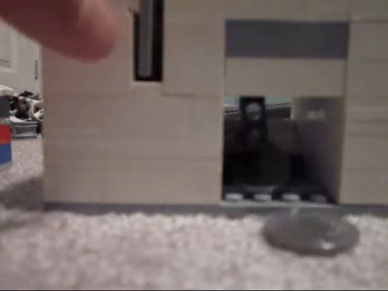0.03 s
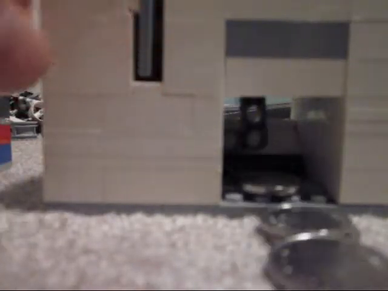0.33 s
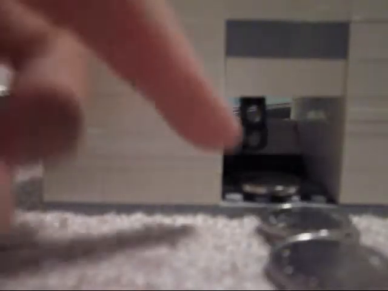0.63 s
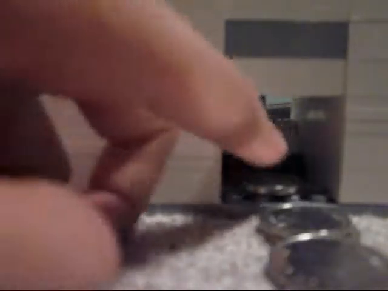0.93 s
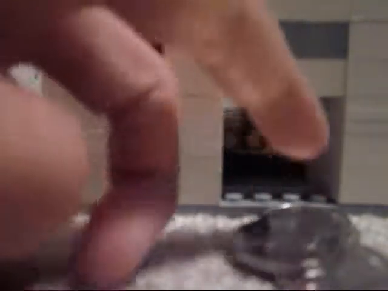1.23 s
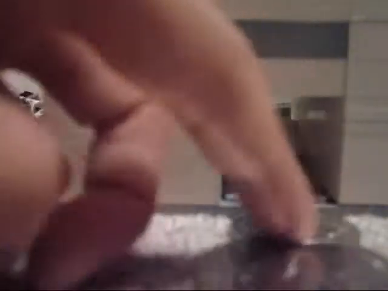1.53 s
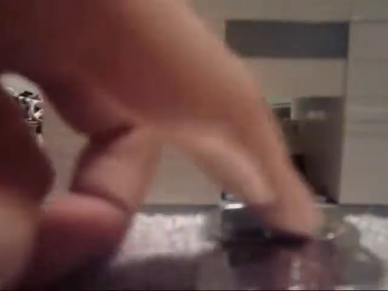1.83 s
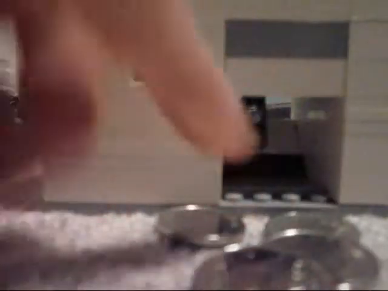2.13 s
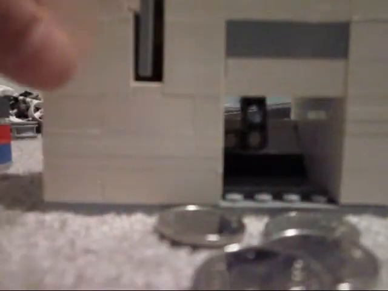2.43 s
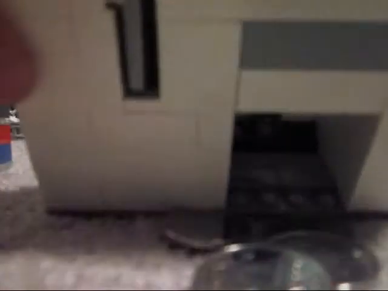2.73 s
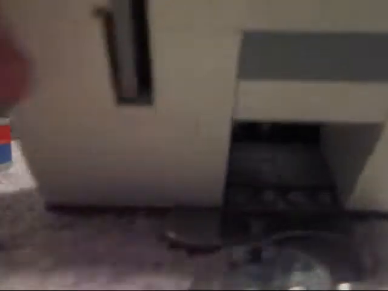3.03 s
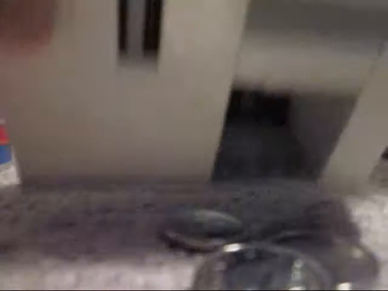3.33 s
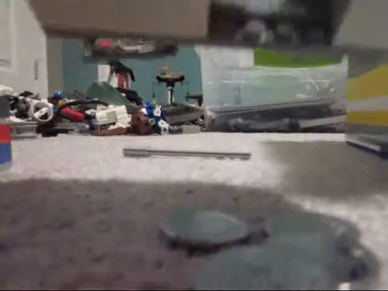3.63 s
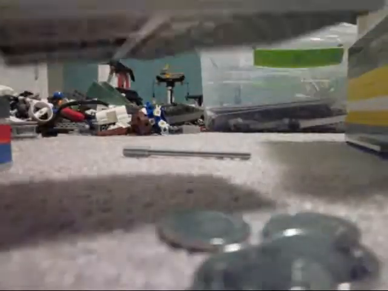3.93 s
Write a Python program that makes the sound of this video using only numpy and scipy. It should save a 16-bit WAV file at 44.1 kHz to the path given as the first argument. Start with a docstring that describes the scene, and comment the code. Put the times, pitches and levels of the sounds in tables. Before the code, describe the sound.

In a quiet room, coins clatter into the tray of a plastic brick toy, and a finger flicks one out and slides them over carpet. The handled toy then knocks and rustles, close to a slightly crackly microphone.

```python
"""On the carpet of a quiet room, close to a toy machine built of plastic bricks. Coins rattle down its
chute and drop into the tray; a finger flicks one out and slides the pile over the carpet. Then the hollow
box is gripped and lifted, its loose parts clacking. The microphone is that of a small camera close by,
whose low sample rate and coarse steps add crackle and a glassy treble."""
import sys
import numpy as np
from scipy import signal
from scipy.io import wavfile
from scipy.ndimage import uniform_filter1d

SR = 44100
rng = np.random.default_rng(int(sys.argv[2]) if len(sys.argv) > 2 else 0)


def digitize_waveform(pressure):
    """Quantize a signal to 16-bit integers and store it at the path in sys.argv[1].

    Rows of a 2-D input are taken as channels; values are limited to [-1, 1].
    """
    field = np.atleast_2d(pressure).T
    bounded = np.clip(field, -1, 1)
    quanta = np.round(bounded * 32767).astype(np.int16)
    wavfile.write(sys.argv[1], SR, quanta)


N = 176400

# Coins striking the chute and tray. Each row: time in seconds, relative level in dB,
# then offsets in dB for the clack, edge and thump bands.
COIN_HITS = [(0.016, -28, -1, -12, -27), (0.024, -29.5, -0.5, -10.5, -20.5),
             (0.03, -29.5, 1.5, -5.5, -20.5), (0.075, -32, 0.5, -7.5, -26), (0.089, -33, 4, -27, -15),
             (0.101, -29, 1, -3.5, -25), (0.121, -24, -3, -5, -15.5), (0.128, -25.5, -1.5, -5, -25),
             (0.167, -25, -2.5, 4, -19.5), (0.224, -34, -9, -2.5, -12.5), (0.345, -21.5, -3.5, -6.5, -41),
             (0.349, -27, -0.5, -10.5, -28), (0.37, -29, -2, -6, -20.5), (0.394, -38, -4.5, -2, -29),
             (1.051, -16.5, -2, -7.5, -20.5), (1.056, -26.5, -6.5, -44, -26), (1.077, -39.5, 7, -0.5, -4.5),
             (1.117, -16, -7.5, -7, -41), (1.123, -23, -0.5, -9.5, -19), (1.14, -23.5, -5.5, -5, -17)]
# Coins tapping each other on the carpet, damped by the finger. Rows as in COIN_HITS.
COIN_TAPS = [(1.424, -35.5, -9.5, -3.2, -8.5), (1.462, -61.5, 4, 5, -13), (1.523, -46.5, -4, 2.9, -11),
             (1.535, -40.5, -1.5, -2.8, -16.5), (1.571, -59, 1, 7.3, -15), (1.616, -58, -6, 4.4, -0.5),
             (1.798, -37.5, -8, -2.5, -5), (1.931, -40.5, -7, -7.5, -10.5)]
# Loose bricks knocking in the box. Rows as in COIN_HITS.
BRICK_HITS = [(1.847, -28, -4, -17.5, -30), (2.477, -30, -7.5, -9.5, -8.5),
              (2.486, -29.5, -18.5, -17.5, -13), (2.53, -26.5, -14, -28, -27),
              (2.546, -20, -13.5, -21, -27.5), (2.567, -30.5, -7.5, -21.5, -20),
              (2.617, -29.5, -10, -39, -15), (2.656, -23, -12.5, -19.5, -19.5),
              (2.663, -22.5, -5.5, -20, -21.5), (2.684, -13.5, -1.5, -17.5, -15.5),
              (2.707, -19, -6, -40, -26), (2.716, -29, -1.5, -18, -23), (3.11, -28.5, -9, -16.5, -23),
              (3.171, -29, -5.5, -14.5, -30), (3.179, -25, -17.5, -26.5, -51),
              (3.321, -32, -3.5, -6.5, -27), (3.331, -18, -14.5, -33.5, -23.5),
              (3.351, -37, -6.5, -16, -9.5), (3.377, -35, -5.5, -14, -13), (3.678, -26, -12.5, -15, -24),
              (3.689, -23, -21.5, -23, -26), (3.712, -31, -13, -18, -11.5), (3.721, -24.5, -27, -15, -14),
              (3.806, -12, -5, -29, -26.5), (3.811, -23, -1, -4, -15), (3.822, -29, -7, -2.5, -8.5),
              (3.911, -21, 2, -10.5, -29), (3.92, -43, 9, -25.5, -13)]
# Short movements. Each row: start in seconds, length in seconds, level in dB.
COIN_RATTLES = [(0, 0.049, -30.5), (.088, 0.098, -32), (.19, 0.12, -31.5), (.355, 0.03, -42),
                (1.042, 0.092, -32)]  # coins skittering over the studs
BRICK_RATTLES = [(2.488, 0.0087, -32), (2.52, 0.046, -43), (2.62, 0.021, -45.5), (2.654, 0.023, -27.5),
                 (2.715, 0.0061, -38), (3.115, 0.069, -45), (3.27, 0.071, -43.5), (3.675, 0.034, -42.5),
                 (3.775, 0.026, -40), (3.795, 0.015, -31.5), (3.945, 0.021, -48.5)]  # bricks chattering against each other
COIN_SLIDES = [(1.365, .03, -57), (1.475, 0.024, -47.5), (1.512, 0.017, -44.5), (1.74, 0.074, -57.5),
               (1.86, 0.086, -37.5)]  # coins pushed over the carpet
# The hand rustling on box and carpet. Each row: time in seconds, level in dB.
HAND_RUSTLE = [(0, -88), (.52, -80), (0.682, -67.5), (0.782, -56.5), (0.858, -44), (.95, -54.5),
               (1.042, -45.5), (1.15, -79), (2, -79), (2.2, -65), (2.43, -55.5), (2.6, -43.5), (2.8, -65.5),
               (3.079, -51.5), (3.3, -41), (3.441, -45.5), (3.7, -41.5), (3.882, -57), (3.948, -46.5),
               (4, -62.5)]
# Resonances. Each row: frequency in Hz, relative level in dB, seconds to die away by 60 dB.
CHUTE_MODES = [(941, -7, 0.049), (1102, -1, .08), (1173, 0.5, 0.052), (1358, -5.5, 0.05),
               (1560, -6.5, 0.05), (2044, -6, 0.088), (2120, 1, 0.053), (2362, -1, .03),
               (3274, -10.5, 0.031), (3605, -6.5, .05), (4070, -3, 0.074)]
BOX_MODES = [(744.5, -12.5, 0.054), (1102, -1, .085), (1176, -1.5, 0.06), (1266, 2, .04), (1629, -2, 0.054),
             (1838, 0, 0.028), (2026, -1.5, 0.041), (3000, -14.5, 0.067), (3377, -12.5, 0.027),
             (4000, -14.5, 0.08)]
COIN_MODES = [(1886, -2, 0.025), (3760, -4, .035), (4330, -5, .03)]
# The thump, knock, clack and edge bands of a blow. Each row: lower and upper limit in Hz.
BLOW_BANDS = [(20, 280), (620, 1500), (1500, 2700), (2700, 7000)]
# The tone colour of each noise. Each row: frequency in Hz, relative level in dB.
CRACK_COLOUR = [(30, -16.5), (300, -15.5), (600, -12), (1000, 0), (2200, -1.5), (2900, -9), (4200, -5),
                (6000, -7)]
COIN_COLOUR = [(30, -24), (200, -9), (420, 1.5), (700, -4), (1000, -3.5), (1600, -3.5), (2200, -2.5),
               (3000, 2.5), (4200, -3.5), (6000, -4.5)]
BRICK_COLOUR = [(30, -9.5), (300, -13), (600, -2.5), (1100, -5), (2000, -1), (2700, -3), (6000, -9)]
SLIDE_COLOUR = [(30, -2.5), (400, -2), (1100, 1), (1600, -3.5), (3000, -2), (6000, -1)]
RUSTLE_COLOUR = [(30, -8), (100, -1), (240, -0.5), (500, -5), (900, -4), (1150, -2.5), (1500, -10),
                 (2100, -7.5), (3000, -16.5), (6000, -17)]
ROOM_TONE_COLOUR = [(30, -2), (250, -0.5), (600, -0.5), (1300, -6.5), (2000, 0), (3000, -7), (6000, -15)]

LIFT_S, HELD_RING = 3, 0.66  # once lifted, the hand damps the box: share of the ring time left


def coins():
    """Coins set the plastic chute ringing, tap against each other and skitter over the studs."""
    drops = hits(COIN_HITS, CHUTE_MODES, crack_db=9.5, crack_t60=.051,
                 snap_db=-5.5, snap_s=.0023, gain_db=-2)
    taps = hits(COIN_TAPS, COIN_MODES, crack_db=5, crack_t60=.03, snap_db=4, snap_s=.0014, gain_db=.5)
    skitter = rattle(COIN_RATTLES, CHUTE_MODES, COIN_COLOUR, per_s=550, spread_db=7,
                     crack_db=9, detune=.025)
    return drops + taps + skitter


def bricks():
    """Loose bricks knock and chatter, ringing the hollow box."""
    knocks = hits(BRICK_HITS, BOX_MODES, crack_db=6, crack_t60=.031,
                  snap_db=-5.5, snap_s=.0056, gain_db=-1.5)
    chatter = rattle(BRICK_RATTLES, BOX_MODES, BRICK_COLOUR, per_s=900, spread_db=1.5,
                     crack_db=7, detune=.017)
    return knocks + chatter


def hits(table, modes, crack_db, crack_t60, snap_db, snap_s, gain_db):
    """Single blows: a hard first snap, a low shove and a short ring, balanced in four bands."""
    shove_db, shove_s = -3, .004
    thump_trim_db, knock_db = -2, -6
    lead_s, onset_s = .001, .01  # a contact starts just before its peak; its onset sets the level
    out = np.zeros(N)
    bands = [signal.butter(3, limits, "band", fs=SR, output="sos") for limits in BLOW_BANDS]
    for time_s, level_db, clack_db, edge_db, thump_db in table:
        ring_share = HELD_RING if time_s > LIFT_S else 1
        ringing = ring([(hz, db, t60 * ring_share) for hz, db, t60 in modes], crack_db, crack_t60)
        t = np.arange(len(ringing)) / SR
        snap = 1 + amp(snap_db) * np.exp(-t / snap_s)
        shove = amp(shove_db) * (1 - t / shove_s) * np.exp(-t / shove_s)
        blow = ringing * snap + shove
        for sos, band_db in zip(bands, (thump_db + thump_trim_db, knock_db, clack_db, edge_db)):
            band = signal.sosfilt(sos, blow)
            band /= band[:round(onset_s * SR)].std()
            add(out, time_s - lead_s, band * amp(gain_db + level_db + band_db))
    return out


def rattle(table, modes, tone, per_s, spread_db, crack_db, detune, spots=8):
    """Many small impacts at several spots of the plastic, each spot with its own ring."""
    envelope, out = bursts(table), np.zeros(N)
    for _ in range(spots):
        spot = colour(ring(modes, crack_db, crack_t60=.025, detune=detune), tone)
        impacts = envelope * unit(contacts(per_s / spots, spread_db))
        out += signal.oaconvolve(impacts, spot / np.linalg.norm(spot))[:N]
    return out / np.sqrt(spots)


def ring(modes, crack_db, crack_t60, detune=.014):
    """One contact: a noisy crack and the modes, each weighted a little by where the blow lands."""
    t = np.arange(SR // 6) / SR
    crack = unit(colour(rng.standard_normal(len(t)), CRACK_COLOUR))
    out = amp(crack_db - 60 * t / crack_t60) * crack
    for hz, db, t60 in modes:
        shift, weight = rng.uniform(-1, 1, 2)
        decay = amp(db + 2 * weight - 60 * t / t60)
        out += rng.choice([-1, 1]) * decay * np.sin(2 * np.pi * hz * (1 + detune * shift) * t)
    return out


def hand():
    """Fine grains of friction: the hand rubs box and carpet and slides the coins along."""
    rustle_level = amp(np.interp(np.arange(N) / SR, *np.transpose(HAND_RUSTLE)))
    rustle = unit(colour(contacts(per_s=3500, spread_db=3.5), RUSTLE_COLOUR))
    scrape = unit(colour(contacts(per_s=4000, spread_db=9.5), SLIDE_COLOUR))
    return rustle_level * rustle + bursts(COIN_SLIDES) * scrape


def room(x, t60=.2, tail_db=-17):
    """The faint, short tail of a carpeted room behind the close, direct sound."""
    t = np.arange(SR // 3) / SR
    tail = rng.standard_normal(len(t)) * amp(-60 * t / t60) * (t > .004)
    return x + amp(tail_db) * signal.oaconvolve(x, tail / np.linalg.norm(tail))[:N]


def room_tone(level_db=-60.5):
    """Steady, faint background noise at the microphone."""
    return amp(level_db) * unit(colour(rng.standard_normal(N), ROOM_TONE_COLOUR))


def contacts(per_s, spread_db):
    """Irregular train of small impacts of uneven strength."""
    times = np.cumsum(rng.uniform(.1, 1.9, 20000)) / per_s
    strength = amp(spread_db * rng.uniform(-.91, 1, len(times))) * rng.choice([-1, 1], len(times))
    inside = times < N / SR
    return np.bincount((times[inside] * SR).astype(int), strength[inside], N)[:N]


def bursts(table, rise_s=.0014, fall_s=.014):
    """Envelope of a list of movements: quick rise, hold, short fall."""
    t, envelope = np.arange(N) / SR, np.zeros(N)
    for start, length, db in table:
        rise = np.clip((t - start) / rise_s, 0, 1)
        fall = np.exp(-np.maximum(t - start - length, 0) / fall_s)
        envelope += amp(db) * rise * fall
    return envelope


def colour(x, points):
    """Minimum-phase filter with the given spectrum."""
    hz, db = np.transpose(points)
    bin_hz = abs(np.fft.fftfreq(2048, 1 / SR))
    log_gain = np.log(amp(np.interp(np.log(bin_hz + 1), np.log(hz), db)))
    taps = np.fft.ifft(np.exp(signal.hilbert(log_gain).conj())).real
    return signal.fftconvolve(x, taps)[:len(x)]


def amp(db):
    """Decibels to gain."""
    return 10 ** (np.asarray(db) / 20)


def unit(x):
    """Scales to rms 1."""
    return x / np.sqrt(np.mean(x ** 2) + 1e-20)


def add(mix, start_s, sound):
    """Mixes a sound in at its start time."""
    part = mix[max(round(start_s * SR), 0):][:len(sound)]
    part += sound[:len(part)]


def scene():
    """Coins, bricks and hand as they reach one close microphone in the quiet room."""
    return (room(coins() + bricks() + hand()) + room_tone())[None]


def record(dry):
    """Mild gain control and the camera's slow sampling in coarse steps.
    Then a faint, even hiss is added under the whole sound and the highest treble is cut."""
    threshold_db, duck_share, recover_db_per_s, lag_s = -45.5, .18, 54.5, .08
    camera_hz, step, bias_steps = 12000, 1 / 128, -.33
    even_hiss_db, cutoff_hz = -71.5, 15700
    power_db = 10 * np.log10(abs(uniform_filter1d(dry[0] ** 2, size=400)) + 1e-12)
    recovery_db = np.arange(N) * recover_db_per_s / SR
    peak_db = np.maximum.accumulate(power_db + recovery_db) - recovery_db
    over_db = np.maximum(peak_db - threshold_db, 0)
    smoothing = 1 / (lag_s * SR)
    ducked = dry[0] * amp(-duck_share * signal.lfilter([smoothing], [1, smoothing - 1], over_db))
    sampled = signal.resample_poly(ducked, camera_hz, SR)
    stepped = step * np.round(sampled / step + bias_steps)  # quiet sounds break into crackle
    held = stepped[np.arange(N) * camera_hz // SR]  # held samples mirror the sound into the treble
    hiss = amp(even_hiss_db) * rng.standard_normal(N)
    lowpass = signal.firwin(255, cutoff_hz, window=("kaiser", 9), fs=SR)
    return signal.oaconvolve(held + hiss, lowpass, "same")[None]


dry = scene()
out = record(dry)
digitize_waveform(out)
```